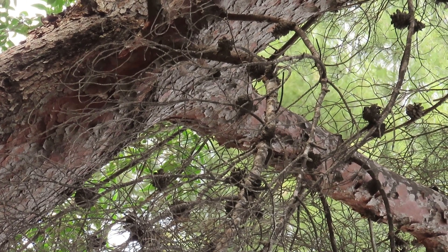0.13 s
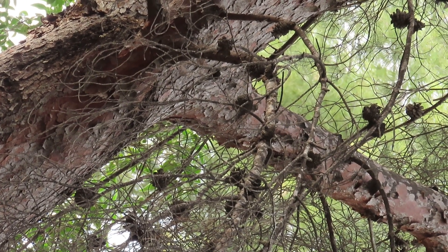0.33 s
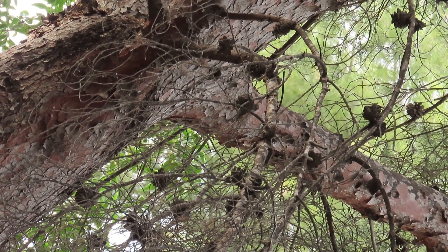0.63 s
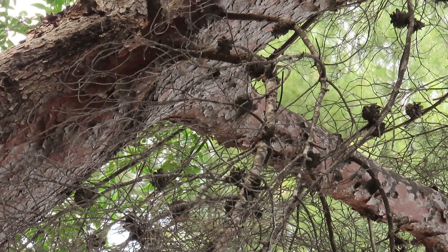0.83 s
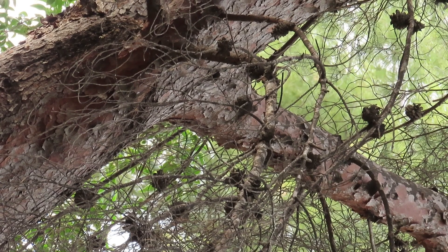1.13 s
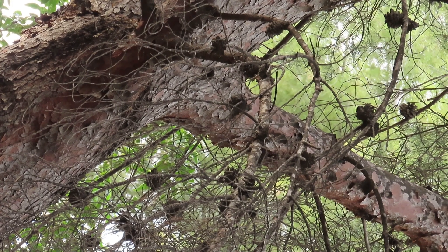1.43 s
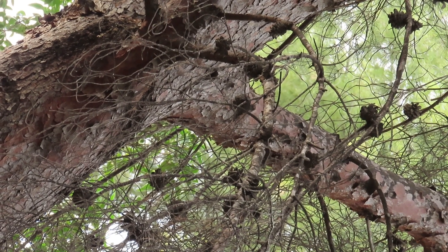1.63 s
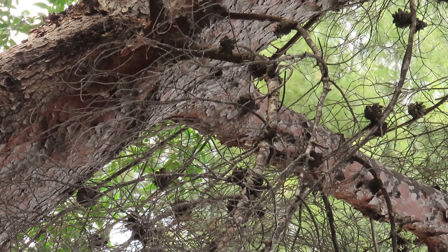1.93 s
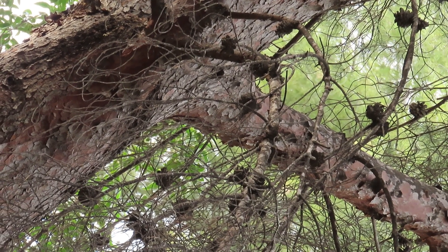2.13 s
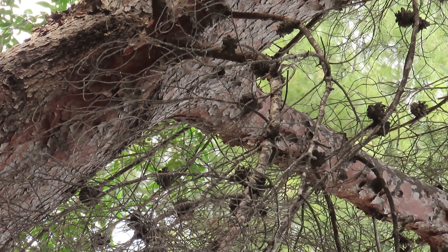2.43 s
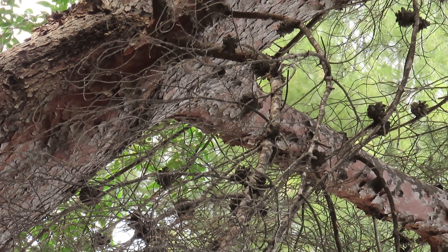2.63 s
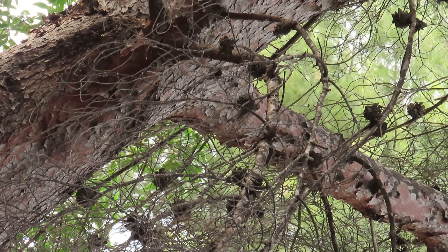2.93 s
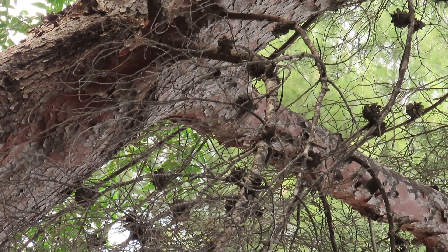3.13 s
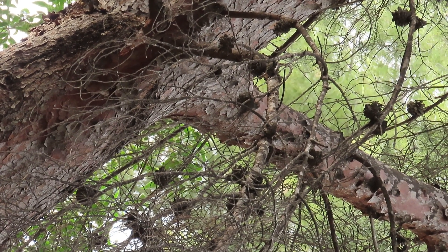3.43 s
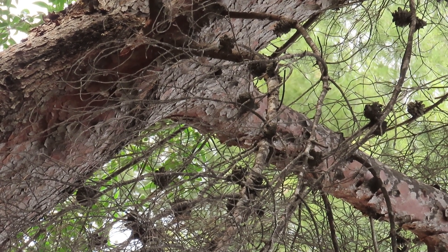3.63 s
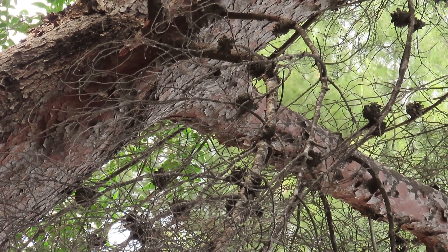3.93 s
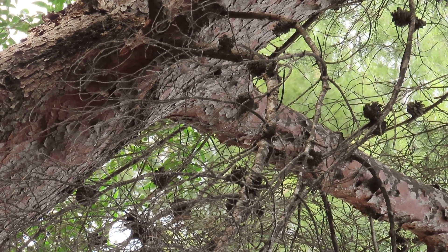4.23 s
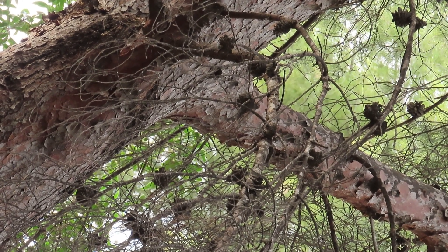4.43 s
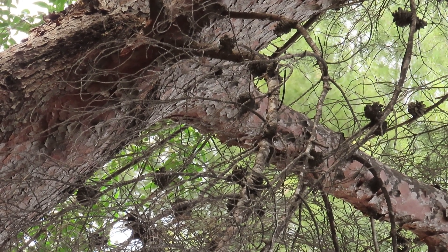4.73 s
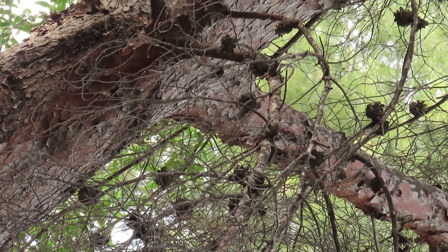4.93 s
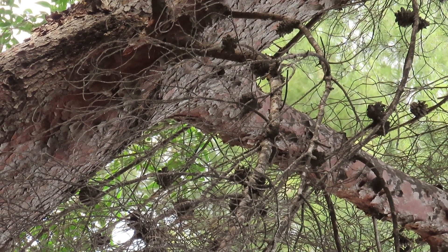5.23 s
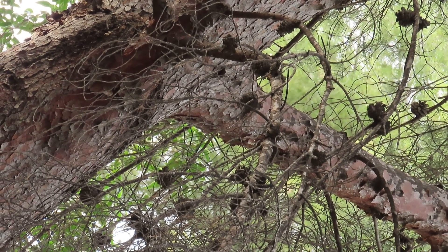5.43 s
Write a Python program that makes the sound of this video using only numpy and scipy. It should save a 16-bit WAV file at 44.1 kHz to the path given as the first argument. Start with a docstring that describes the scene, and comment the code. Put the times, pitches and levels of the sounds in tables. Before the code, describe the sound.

Outdoors among pines, a close squirrel gives a dry, rapid rattle fading into tiny peeps. A second rattles back, a third calls faintly far off, then the close one scolds sharply up to a squeal and the second replies. Later comes a loud harsh chatter from the close one and a last answer. Low traffic rumble and slight air hiss continue beneath; stereo microphone, close voice crisp, others echoing.

```python
"""A low traffic rumble under soft open-air hiss, then squirrels scolding each other in a pine.
A close one rattles drily, trails off in peeps, scolds up to a squeal and chatters harshly; a second
calls from behind branches, a third from far away, and a faint hum and a hoot sound in the distance.
Each cry is a run of vocal pulses and hiss ringing a throat, with the pitch bent or gliding;
bark and trees add echoes. The rumble and hiss are shaped noise, the hum and hoot sine tones."""
import sys
import numpy as np
from scipy import signal
from scipy.fft import rfft, irfft, next_fast_len
from scipy.io import wavfile
from scipy.ndimage import uniform_filter1d, map_coordinates

SR = 44100
rng = np.random.default_rng(int(sys.argv[2]) if len(sys.argv) > 2 else 0)


def pcm_store(signal):
    """Save signal as 16-bit PCM."""
    levels = np.round(np.clip(np.atleast_2d(signal), -1, 1) * 32767)
    wavfile.write(sys.argv[1], SR, levels.astype(np.int16).T)


N = 245637

# Background spectra, relative density: (f/Hz, level/dB)
RUMBLE_SPECTRUM = [(12, -46), (20, -16), (30, -9), (53, 1), (75, 1), (97, -3.5), (130, -3), (147, -2.5),
                   (173, -12), (242, -11.5), (269, -13.5), (296, -11.5), (338, -21), (377, -21.5),
                   (500, -25.5), (650, -37.5), (1100, -120)]
AIR_SPECTRUM = [(210, -27), (350, -2), (379, -2.5), (622, -10), (719, -9), (1160, -15.5), (1600, -16.5),
                (2390, -24.5), (2670, -24.5), (6030, -34.5), (14500, -49.5), (16000, -59)]
# Drift of the rumble: (t/s, level of its lulls/dB)
RUMBLE_LULLS = [(0.0, -30.5), (0.65, -32), (2.19, -33), (2.31, -31.5), (5.57, -33.5)]
# How alike the background is at the two microphone ports: (f/Hz, left-right correlation)
BACKGROUND_LIKENESS = [(60, 1), (150, .995), (380, 0.93), (950, 0.82), (2380, 0.72), (5980, 0.44),
                       (15000, 0.54)]
RUMBLE_SWELL_DB, AIR_DB = 1.25, -44  # rumble's mean level over its lulls; level of the air hiss

# Effort curves of the runs, read between points; distance trims and echoes come later.
# Columns: (t/s, syllable length/s, level/dB, middle pitch f/Hz)
RATTLE_EFFORT = [(0.582, .006, -39.5, 378), (0.618, 0.0069, -24, 353), (.665, 0.0097, -21, 362),
                 (0.736, 0.012, -18.5, 499), (0.799, 0.0142, -20.5, 419.6), (.865, 0.0115, -19, 360),
                 (.89, .012, -22, 315), (0.919, 0.011, -28, 259)]  # swells and sinks
PEEP_EFFORT = [(0.936, .018, -49.5, 1558), (1.226, .028, -51, 1440)]  # lengthens and sags
RIVAL_RATTLE_EFFORT = [(1.373, 0.0074, -43, 402), (1.394, 0.0061, -32, 483), (1.474, 0.0099, -27, 484),
                       (1.541, .0155, -25.7, 669), (1.619, .0145, -24.5, 762), (1.692, .012, -26.5, 681)]
LEAD_IN_EFFORT = [(2.904, 0.016, -44.5, 1420), (2.936, 0.019, -35, 1310)]  # a faint flurry of soft sound leading into the close scold
CHATTER_EFFORT = [(4.623, .011, -22, 495), (4.661, .0115, -14, 796), (4.729, 0.014, -13.5, 1000),
                  (4.803, .0125, -15.5, 958), (4.83, 0.0078, -26, 1204)]
# Pace of the runs: (start t/s, then gaps/s spread evenly from first to last)
RATTLE_GAPS = (.548, .0188, .0223, .0287)  # slowing
PEEP_GAPS = (.931, .045, .060, .072)
RIVAL_RATTLE_GAPS = (1.370, .0215, .0238, .0257, .0225, .021)
LEAD_IN_GAPS = (2.903, 0.017)
CHATTER_GAPS = (4.626, .0186, .0208, .0205)
# Pitch bend of a syllable: (start, end), as ratios to its middle pitch
RATTLE_TURN = (1.39, 0.86)
PEEP_TURN = (0.65, 0.91)
RIVAL_RATTLE_TURN = (1.42, 1.1)
CHATTER_TURN = (1.4, 1.28)
FIRST_TURN = (.94, 1.16)  # first opening syllable of a scold
OPENING_TURN = (1.48, 1.435)  # opening syllables at full effort
CLOSING_TURN = (1.58, 1.273)

# Throat and mouth resonances at the voice's resting pitch, relative level: (f/Hz, level/dB)
RATTLE_RESONANCE = [(150, -16), (420, -8), (650, -8.5), (880, -6), (1250, -13), (1800, -2.5), (2250, 1.5),
                    (2950, -7), (3600, 1), (4300, -9), (5400, -19.5), (5900, -21), (9700, -26.5),
                    (11000, -50)]
PEEP_RESONANCE = [(800, -32.5), (2200, -23), (3000, -8.5), (3700, -6.5), (4600, -12), (6000, -28),
                  (10000, -43), (14000, -60)]
RIVAL_RATTLE_RESONANCE = [(400, -36), (900, -19), (1400, -8.5), (2300, -8), (2650, 4.5), (2950, 5),
                          (3300, -0.5), (3950, 0), (5100, -11), (6000, -9), (7500, -12), (10000, -22.5),
                          (11000, -30), (14500, -40)]
FAR_RESONANCE = [(500, -24), (1300, -12), (2200, -10), (2700, 3), (4200, 1), (5200, -15), (8000, -23),
                 (11000, -45), (15000, -63)]
CLOSE_RESONANCE = [(300, -27), (850, -20.5), (1700, -7), (2100, -6), (2500, -7), (3150, 7.5), (4000, -2.5),
                   (4700, -5.5), (5900, -15), (7200, -12.5), (8400, -18), (11900, -29), (13300, -44),
                   (15800, -48)]
RIVAL_RESONANCE = [(400, -33), (900, -20), (1300, -12.5), (2200, -8), (2700, -2.5), (3700, 3.5), (4400, -4),
                   (5100, -7.5), (6000, -6.5), (6800, -14.5), (7500, -11), (9700, -21), (11000, -34),
                   (13300, -34), (15000, -60)]
# Lift of an open mouth: (f/Hz, share of the gape's dB)
MOUTH_LIFT = [(650, 1.7), (1000, 0.068), (1500, -0.037), (2200, -0.63), (3100, -0.96), (4500, -0.015),
              (6500, 1), (9000, -0.023), (12000, -0.25)]
FLUTTER_DB = 1.3  # random ripple of the resonances

# Faint distant tones, a low hum and a hoot: (t/s, length/s, level/dB, f/Hz)
DISTANT_TONES = [(2.02, 0.58, -38, 128.2), (5.175, 0.075, -41, 514)]

# Scolds: (start t/s, squeal start t/s, squeal end t/s, opening syllable length/s, first f/Hz, full f/Hz,
#          first level/dB, full level/dB, squeal level/dB, squeal dip/Hz); distance trims come later
FAR_CALLS = [(2.402, 2.488, 2.520, 0.0176, 1054, 1243, -38, -34, -35, 0)]
CLOSE_CALLS = [(2.952, 3.004, 3.049, 0.02, 1014, 1094, -12.5, -11.5, -13, 280)]
RIVAL_CALLS = [(3.323, 3.385, 3.427, .016, 951, 1195, -30, -23, -22.5, 302),
               (4.970, 5.036, 5.084, 0.0134, 713, 1223, -30, -20, -19.5, 0)]
# Squeal scoops down, leaps high and drops off: (share of its length, f/Hz, level over squeal level/dB)
SQUEAL_SHAPE = [(0, 1780, -3), (.09, 1286, 1), (.22, 1376, 1), (.33, 1904, 0.5), (.45, 2040, 0.5),
                (.76, 2200, -2.5), (.92, 1550, 0.5), (1, 1720, -18)]
OPENING_GAP_S = .0225  # rough gap, sets how many opening syllables fit
OPENING_LAG = 0.293  # share of the missing effort still missing a syllable later
OPENING_HURRY = .93  # under 1, the opening syllables come ever faster
SQUEAL_DIP_AT, SQUEAL_DIP_WIDTH = .63, 0.081  # one downward waver, shares of the squeal
CLOSING_PAUSE_S, CLOSING_GAP_S, CLOSING_LENGTH_S = 0.00093, .0167, 0.01456
CLOSING_HZ, CLOSING_SAG_HZ, CLOSING_FADE_DB = 1251, 91.2, 1.2  # sag and fade per syllable

# Reflections right beside a squirrel: (delay t/s, level/dB)
BARK_ECHOES = [(.00083, -32), (.0021, -26)]
# Echo of the wood, time to fall 60 dB: (f/Hz, t60/s)
TREE_DECAY = [(500, 0.36), (2000, 0.7), (3500, 0.85), (6000, 0.41), (12000, 0.42)]
# Colour of that echo, relative: (f/Hz, level/dB)
TREE_COLOUR = [(300, -11), (1500, -4.5), (2700, -3), (3400, -4.5), (5000, 0), (7000, 3.5), (12000, 0)]
# Balance of the two ports: (f/Hz, left minus right level/dB)
LEFT_RIGHT_BALANCE = [(400, -0.5), (1500, 1.7), (2400, 0.2), (15000, 1)]
# Phase between the ports: (f/Hz, left lead/rad)
CLOSE_LEAD = [(0, 0), (4000, 0.43), (6000, 0.43), (8600, 1.13), (14000, 1.4)]
OTHERS_LEAD = [(0, -0.51), (4000, 0.14), (7800, -0.38), (8700, -0.65), (10500, -0.15), (16000, -0.2)]  # second and far squirrel
TOP_HZ = 15900  # upper band limit


def amp(db):
    """Decibels to gain."""
    return 10 ** (np.asarray(db) / 20)


def unit(x):
    """x at rms 1."""
    return x / np.sqrt(np.mean(x ** 2) + 1e-20)


def along(points, hz):
    """(f/Hz, value) points read on a log frequency axis."""
    f, v = np.transpose(points)
    return np.interp(np.log(hz + 1), np.log(f + 1), v)


def add(track, s, sound):
    """Mix a sound into the track at time s."""
    room_left = track[round(s * SR):]
    room_left[:len(sound)] += sound[:len(room_left)]


def filtered(x, response):
    """x times a response of frequency."""
    m = next_fast_len(N + SR // 2)
    return irfft(rfft(x, m) * response(np.fft.rfftfreq(m, 1 / SR)), m)[..., :N]


def rush(spectrum, patchy_db):
    """Shaped stereo noise of rms 1 with slow patches of random gain and a set left-right likeness."""
    z = signal.stft(rng.standard_normal((2, N)), nperseg=1024)[2]
    patches = uniform_filter1d(rng.standard_normal(z.shape[1:]), size=5, axis=0)  # across frequency
    patches = uniform_filter1d(patches, size=12, axis=1)  # across time
    pair = signal.istft(z * amp(patchy_db * unit(patches)), nperseg=1024)[1][:, :N]

    def mid_side_gain(hz):
        # splitting power between mid and side sets the correlation
        turn = np.arccos(np.clip(along(BACKGROUND_LIKENESS, hz), -1, 1)) / 2
        return amp(along(spectrum, hz)) * [np.cos(turn), np.sin(turn)]

    mid, side = filtered(pair, mid_side_gain)
    return unit(np.array([mid + side, mid - side]))


def background():
    """Distant traffic, a drifting low noise, rumbles under the soft noise hiss of the open air."""
    rumble_db = np.interp(np.arange(N) / SR, *np.transpose(RUMBLE_LULLS)) + RUMBLE_SWELL_DB
    rumble = amp(rumble_db) * rush(RUMBLE_SPECTRUM, patchy_db=1.1)
    return rumble + amp(AIR_DB) * rush(AIR_SPECTRUM, patchy_db=2.5)


def trill(pace, effort, bend, count):
    """A run of like syllables whose gaps drift smoothly: (t/s, length/s, level/dB, start, middle, end f/Hz)."""
    start, *gaps = pace
    steps = np.interp(np.linspace(0, 1, count - 1), np.linspace(0, 1, len(gaps)), gaps)
    times = start + np.append(0, np.cumsum(steps))
    s, *controls = np.transpose(effort)
    length, db, hz = [np.interp(times, s, control) for control in controls]
    return [*zip(times, length, db, bend[0] * hz, hz, bend[1] * hz)]


def ring(spectrum, shift, open_db, size=1024, count=64):
    """The causal ringing of the throat after one pulse; an open mouth flattens its main resonance."""
    hz = np.fft.rfftfreq(size, 1 / SR)
    # no two syllables ring alike
    flutter = map_coordinates(rng.standard_normal(count), [np.linspace(0, count - 1, len(hz))])
    level_db = along(spectrum, hz / shift) + open_db * along(MOUTH_LIFT, hz) + FLUTTER_DB * flutter
    # folding the cepstrum forward gives minimum phase: the ring starts at once
    cepstrum = irfft(np.log(amp(level_db)))
    cepstrum[1:size // 2] *= 2
    cepstrum[size // 2 + 1:] = 0
    return irfft(np.exp(rfft(cepstrum)))[:size // 2]


def pulses(pitch, jitter, shimmer_db, order=8):
    """One sharp pulse per cycle of the vocal folds, uneven in time and size."""
    cycles = np.cumsum(pitch) / SR
    beat = np.arange(int(cycles[-1]) + 1)
    slip, size = rng.standard_normal((len(beat), 2)).T
    at = np.interp(beat + jitter * slip, cycles, np.arange(len(pitch))) + order
    offset = np.arange(len(pitch)) - at[:, None]
    shapes = np.sinc(offset) * np.exp(-(offset / order) ** 2)  # placed between samples
    return amp(shimmer_db * size) @ shapes


def cry(pitch, throat, jitter, rasp, attack, release):
    """Pulses and their turbulent hiss swell, ring the throat and fade; rms 1 while it lasts."""
    t = np.arange(len(pitch)) / SR
    folds_open = np.cos(np.pi * np.cumsum(pitch) / SR) ** 2
    hiss = unit(folds_open * rng.standard_normal(len(t)))
    source = unit(pulses(pitch, jitter, shimmer_db=1.13)) + rasp * hiss
    swell = (1 - np.exp(-t / attack)) * (1 - np.exp(-(t[-1] - t) / release))
    sound = signal.fftconvolve(source * swell, throat)
    return sound * np.sqrt(len(t) / np.sum(sound ** 2))


def squirrel(syllables, squeals, spectrum, rest_hz, jaw, jitter, rasp, attack, release, gape_db=0):
    """Syllables bend through three pitches, squeals glide; resonances rise as (pitch / rest_hz) ** jaw."""
    voice = np.zeros(N)

    def throat(hz):
        gape = gape_db * np.clip(4 * np.log2(1120 / hz), -.6, 1)  # low notes come with a wider mouth
        return ring(spectrum, (hz / rest_hz) ** jaw, gape)

    for s, length, db, *bend in syllables:
        curve = np.polyfit([0, 1 / 2, 1], bend, 2)
        pitch = np.polyval(curve, np.linspace(0, 1, int(length * SR)))
        add(voice, s, amp(db) * cry(pitch, throat(bend[1]), jitter, rasp, attack, release))
    for path in squeals:
        s, hz, db = np.transpose(path)
        t = np.arange(s[0], s[-1], 1 / SR)
        pitch = uniform_filter1d(np.interp(t, s, hz), size=128)
        # taut folds run cleaner
        sound = cry(pitch, throat(hz.mean()), jitter / 2, rasp / 2, attack, release)[:len(t)]
        # evened out, so loudness follows effort whatever the pitch
        loudness = np.sqrt(uniform_filter1d(sound ** 2, size=160) + 0.054)
        add(voice, t[0], amp(np.interp(t, s, db)) * sound / loudness)
    return voice


def off_bark(voice):
    """The limb and trunk right beside the animal return weak copies a moment later."""
    def response(hz):
        return 1 + sum(amp(db) * np.exp(-2j * np.pi * hz * delay) for delay, db in BARK_ECHOES)

    return filtered(voice, response)


def among_trees(voice, branch_db, branch_t60, echo_db):
    """The direct sound, quick noise-like scatter off nearby branches, and the long echo of the wood."""
    hz, frame_t, z = signal.stft(rng.standard_normal((3, SR)), SR, nperseg=256)
    fade_db = along(TREE_COLOUR, hz)[:, None] - 60 * frame_t / along(TREE_DECAY, hz)[:, None]
    echo = signal.istft(z * amp(fade_db), SR, nperseg=256)[1][:, :SR]
    t = np.arange(SR) / SR
    echo = echo * (1 - np.exp(-t / 0.012))
    scatter = rng.standard_normal((3, SR)) * amp(-60 * t / branch_t60) * (1 - np.exp(-t / 0.0013))
    paths = (amp(echo_db) * unit(echo) + amp(branch_db) * unit(scatter)) / np.sqrt(SR)
    ports = paths[0] + paths[1:] / 2  # closely spaced ports share most of each reflection
    return voice + signal.fftconvolve(voice[None], ports, axes=1)[:, :N]


def at_ports(pair, phase):
    """Each direction reaches the two ports with a slightly different phase and level."""
    side = np.array([[1], [-1]]) / 2

    def response(hz):
        lead = np.interp(hz, *np.transpose(phase))
        return amp(side * along(LEFT_RIGHT_BALANCE, hz)) * np.exp(1j * side * lead)

    return filtered(pair, response)


def hoot():
    """Soft, nearly pure notes swell and fade far away: sine tones under a smooth hump."""
    track = np.zeros(N)
    for s, length, db, hz in DISTANT_TONES:
        t = np.arange(int(length * SR)) / SR
        note = np.hanning(len(t)) * np.sin(2 * np.pi * hz * t)
        add(track, s, amp(db) * unit(note))
    return track


def scolds(calls, count=3, size=48):
    """Syllables work up to a squeal, then a few more sink away; gives the syllables and squeal paths."""
    syllables, squeals = [], []
    for (start, squeal_on, squeal_off, length, first_hz, full_hz,
         first_db, full_db, squeal_db, dip_hz) in calls:
        opening_count = round((squeal_on - start) / OPENING_GAP_S)
        progress = np.linspace(0, 1, opening_count, endpoint=False)
        for k, s in enumerate(start + (squeal_on - start) * progress ** OPENING_HURRY):
            effort = 1 - OPENING_LAG ** k
            hz = first_hz + effort * (full_hz - first_hz)
            db = first_db + effort * (full_db - first_db)
            onset, end = hz * np.power(OPENING_TURN, effort) * np.power(FIRST_TURN, 1 - effort)
            syllables.append((s, length, db, onset, hz, end))

        share = np.linspace(0, 1, size)
        knots, *shape = np.transpose(SQUEAL_SHAPE)
        pitch, db = [np.interp(share, knots, column) for column in shape]
        dip = dip_hz * np.exp(-((share - SQUEAL_DIP_AT) / SQUEAL_DIP_WIDTH) ** 2)
        times = np.linspace(squeal_on, squeal_off, size)
        squeals.append(np.column_stack([times, pitch - dip, squeal_db + db]))

        for k in range(count):
            s = squeal_off + CLOSING_PAUSE_S + k * CLOSING_GAP_S
            hz = CLOSING_HZ - k * CLOSING_SAG_HZ
            db = full_db - (k + 1) * CLOSING_FADE_DB
            onset, end = CLOSING_TURN[0] * hz, CLOSING_TURN[1] * hz
            syllables.append((s, CLOSING_LENGTH_S, db, onset, hz, end))
    return syllables, squeals


def scene():
    """Three squirrels over the background: the further away, the more of each voice arrives as echo."""
    # jitter in cycles, rasp is hiss against pulses, attack and release in seconds
    rattle = squirrel(
        trill(RATTLE_GAPS, RATTLE_EFFORT, RATTLE_TURN, count=17), [], RATTLE_RESONANCE,
        rest_hz=425, jaw=.16, jitter=0.063, rasp=0.047, attack=0.00013, release=0.0018)
    peeps = trill(PEEP_GAPS, PEEP_EFFORT, PEEP_TURN, count=6)
    lead_in = trill(LEAD_IN_GAPS, LEAD_IN_EFFORT, PEEP_TURN, count=3)
    soft_sounds = squirrel(
        peeps + lead_in, [], PEEP_RESONANCE,
        rest_hz=1900, jaw=.12, jitter=.02, rasp=.35, attack=0.0031, release=0.0028)
    rival_rattle = squirrel(
        trill(RIVAL_RATTLE_GAPS, RIVAL_RATTLE_EFFORT, RIVAL_RATTLE_TURN, count=15), [],
        RIVAL_RATTLE_RESONANCE,
        rest_hz=564, jaw=0.16, jitter=0.026, rasp=0.15, attack=0.00035, release=0.0038)
    far = squirrel(
        *scolds(FAR_CALLS), FAR_RESONANCE,
        rest_hz=1000, jaw=.12, jitter=.015, rasp=.15, attack=.002, release=0.0029)
    scold = squirrel(
        *scolds(CLOSE_CALLS), CLOSE_RESONANCE,
        rest_hz=1110, jaw=0.15, jitter=.016, rasp=0.19, attack=0.0009, release=0.0011)
    rival = squirrel(
        *scolds(RIVAL_CALLS), RIVAL_RESONANCE,
        rest_hz=1210, jaw=0.091, jitter=0.033, rasp=0.33, attack=0.00042, release=0.0037)
    chatter = squirrel(
        trill(CHATTER_GAPS, CHATTER_EFFORT, CHATTER_TURN, count=11), [], CLOSE_RESONANCE,
        rest_hz=1000, jaw=.06, jitter=.019, rasp=0.12, attack=0.0009, release=0.0022, gape_db=7)

    close_voice = off_bark(rattle + soft_sounds + scold + chatter)
    further_voice = amp(-0.7) * off_bark(rival + rival_rattle)
    close = among_trees(close_voice, branch_db=-25.0, branch_t60=0.39, echo_db=-24.5)
    further = among_trees(further_voice, branch_db=-9.5, branch_t60=0.049, echo_db=-13.0)
    furthest = among_trees(amp(-3.5) * far, branch_db=-7.0, branch_t60=0.12, echo_db=-4.5)
    squirrels = at_ports(close, CLOSE_LEAD) + at_ports(further + furthest, OTHERS_LEAD)
    return squirrels + background() + hoot()


def record(dry):
    """Round off the tallest peaks towards 0.95 of full scale, then keep nothing above the band limit."""
    rounded = dry / (1 + (dry / .95) ** 6) ** (1 / 6)
    return filtered(rounded, lambda hz: hz < TOP_HZ)


dry = scene()
out = record(dry)
pcm_store(out)
```